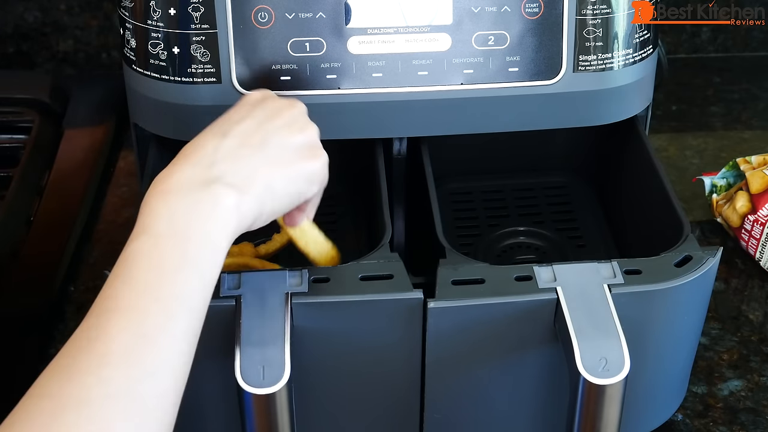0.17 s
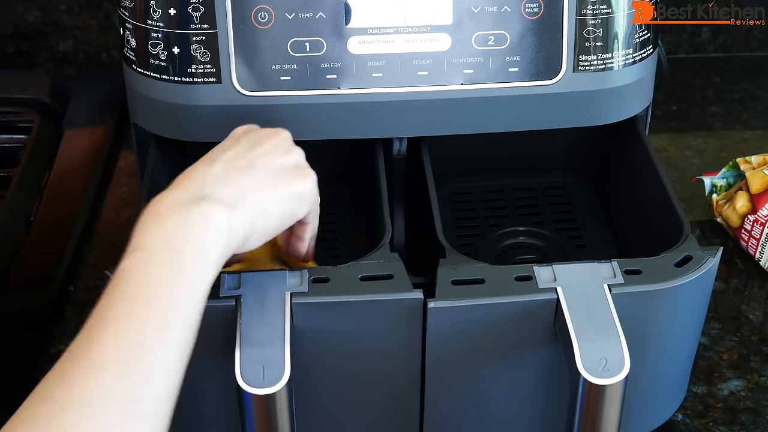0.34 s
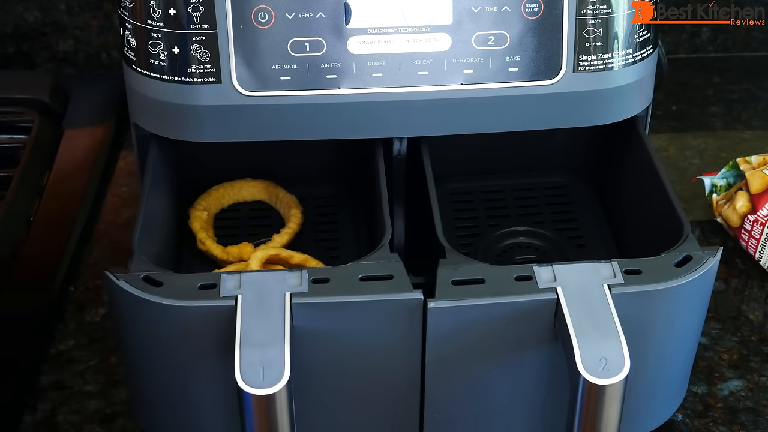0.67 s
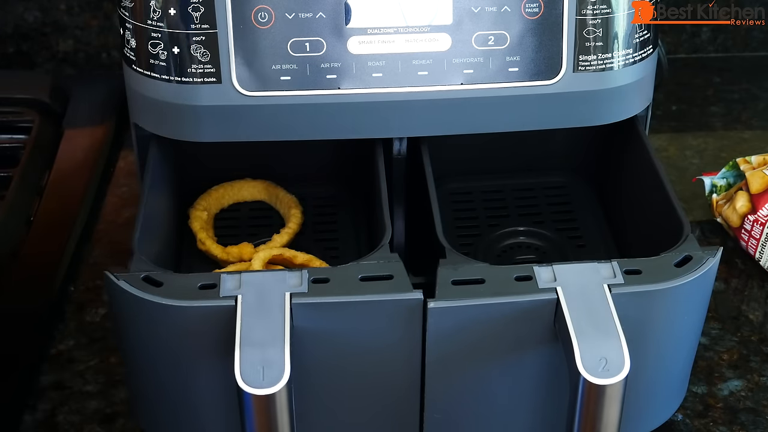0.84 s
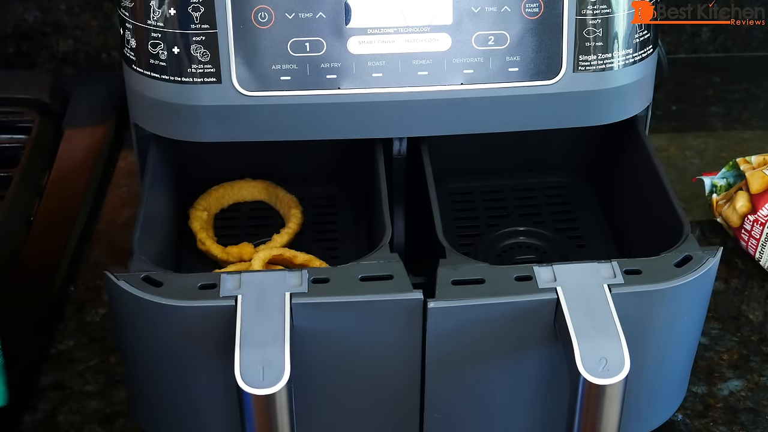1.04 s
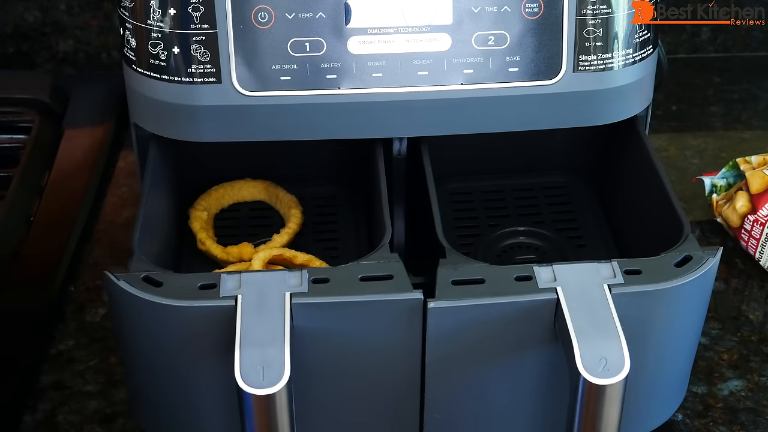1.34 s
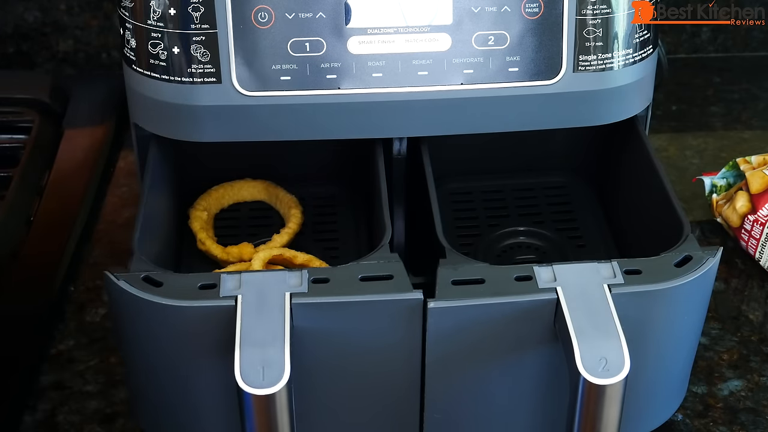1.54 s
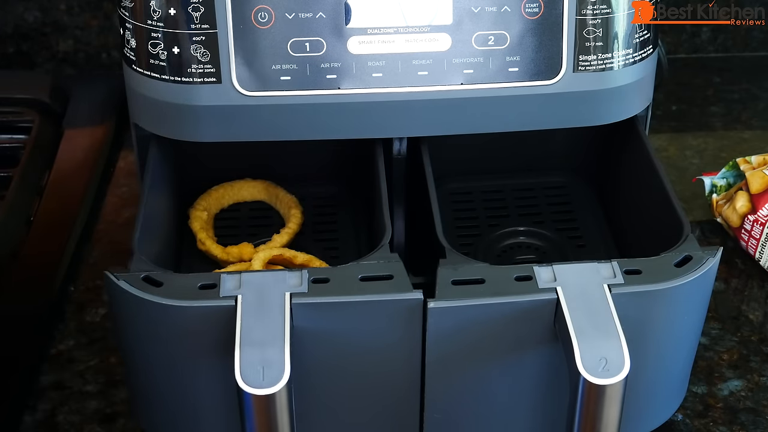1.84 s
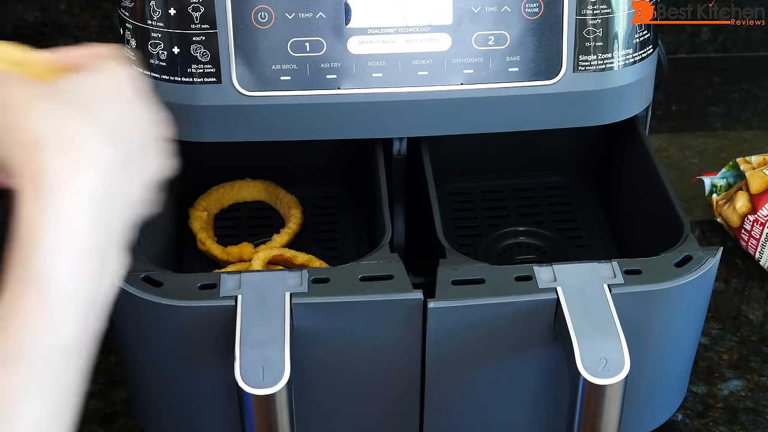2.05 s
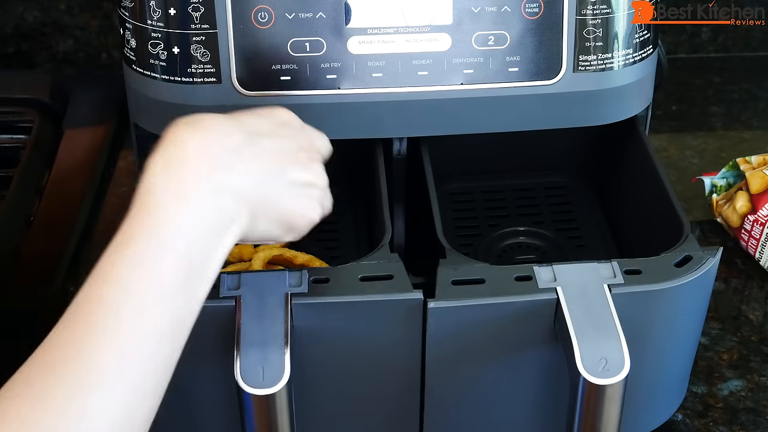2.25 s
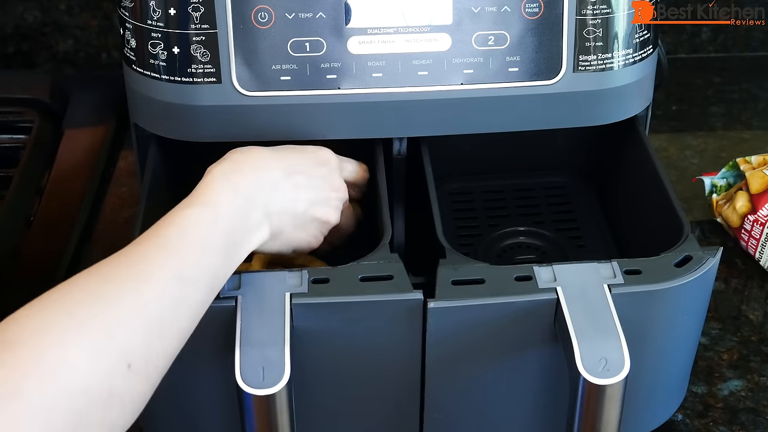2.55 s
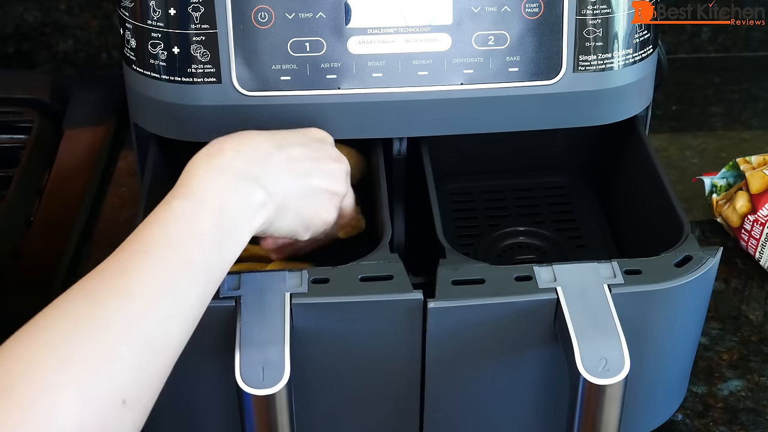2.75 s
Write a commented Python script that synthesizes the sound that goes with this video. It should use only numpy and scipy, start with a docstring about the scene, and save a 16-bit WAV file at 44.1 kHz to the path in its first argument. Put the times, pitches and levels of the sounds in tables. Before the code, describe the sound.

Crusty frozen rings land with light tings and low rattling thuds, then crisp plastic bag crinkling and snapping, a short near silence, and a louder hollow knock with scraping. Close miking, short kitchen reverberation, faint air.

```python
"""Onion rings laid in an air fryer basket

Frozen rings are laid by hand in a small kitchen. Breading scrapes as bursts of coloured clicks and pings.
After the hollow tail of an earlier basket knock, the crisper plate tings and rocks under landing rings.
These and the knocked basket wall are sums of decaying modes. A plastic bag crinkles in click bursts,
its larger folds snapping as short noise with a worktop echo. Shaped noise gives the faint air;
each source passes through a synthetic stereo room response."""
import sys
import numpy as np
from scipy import signal
from scipy.fft import rfft, irfft
from scipy.io import wavfile

SR = 44100
rng = np.random.default_rng(int(sys.argv[2]) if len(sys.argv) > 2 else 0)


def file_out(sig):
    """Save sig as 16-bit WAV at sys.argv[1]."""
    # one column per channel
    cols = np.atleast_2d(sig).T
    # limit, then scale
    lim = np.clip(cols, -1, 1)
    pcm = np.round(lim * 32767).astype(np.int16)
    wavfile.write(sys.argv[1], SR, pcm)


N = 127890  # length of the scene in samples

# Hard crumbs touching the basket: start_s, rise_s, hold_s, fade_t60_s, level_db,
# tilt_db_per_octave, resonance_hz, resonance_db
CRUMB_SCRAPES = [(0.0, .002, 0.008, 0.25, -36.5, 0.6, 5940, 2),
                 (.088, 0.0053, 0.035, 0.16, -53.5, 3.5, 5000, 0),
                 (.122, .012, 0.0033, 0.05, -40, 3.5, 3500, -6),
                 (.138, .007, 0.011, 0.13, -30, 1, 1400, 1.5),
                 (.234, 0.0016, 0.0088, 0.051, -32.5, 1.5, 1900, 15),
                 (.241, 0.0028, 0.0059, 0.16, -37, 7, 4120, 2),
                 (.293, 0.0094, 0.01, 0.19, -48, -1, 4870, 19),
                 (.354, .003, 0.017, 0.058, -43.5, 3, 7340, 4),
                 (.369, .002, 0.026, 0.03, -35.5, -0.4, 2130, 3),
                 (.392, .005, 0.012, 0.11, -38.5, 0, 7900, 4),
                 (.616, 0.0015, 0.011, 0.045, -48.5, 5, 7860, 3),
                 (.629, 0.0023, .008, 0.12, -34.5, -2, 3530, 9.5),
                 (.706, 0.0027, 0.0026, 0.15, -41, -4.5, 6850, 14.5),
                 (2.45, 0.018, .015, 0.089, -58.5, 1.5, 7000, 4.5),
                 (2.488, .016, 0.013, 0.12, -24, 0.56, 945, 5),
                 (2.54, 0.0038, 0.044, 0.21, -35, -2, 1110, -1.5),
                 (2.598, 0.0036, 0.0079, 0.057, -23, -2, 850, 5),
                 (2.612, 0.0016, 0.05, 0.36, -35.5, -4, 1670, 10),
                 (2.722, 0.0014, 0.0053, 0.17, -37, -2, 1550, 4),
                 (2.828, 0.0045, 0.005, 0.17, -67, 1.5, 6900, 4)]
# Rings landing on the plate; the first row is the hollow ringing tail of an earlier basket knock:
# start_s, ting_level_db, ting_centre_hz, thud_level_db, thud_centre_hz
TINGS_AND_THUDS = [(.003, -41, 2100, -27.5, 306), (.09, -59.5, 4500, -35.5, 293),
                   (.144, -44, 5400, -16.5, 303), (0.165, -34, 6900, -21.5, 453),
                   (.237, -41, 5300, -22, 630), (0.262, -38.5, 3480, -25, 380),
                   (.296, -39.5, 5110, -33.5, 600), (.369, -39.5, 2105, -26, 244),
                   (.388, -36.5, 3800, -22, 380), (.401, -38, 8150, -35.5, 613),
                   (0.629, -32, 2800, -23.5, 273)]
# Bending modes of the crisper plate: frequency_hz, relative_level_db, t60_s
PLATE_MODES = [(2110, -1, .1), (2225, -3, .12), (3367, -7, .17), (3430, -5, .16), (3779, -5, .12),
               (4357, -2, .14), (4497, -5, .18), (5262, -7, .14), (5372, -4, .14), (7068, -9, .12),
               (7190, -10, .12), (8250, -4, .17), (9100, -6, .13), (9911, -7, .12), (10640, -10, .13)]
# Modes of the plate rocking on its feet: frequency_hz, relative_level_db, t60_s
ROCKING_MODES = [(187.5, -12.5, .25), (242.7, -2.5, 0.33), (262, -5, 0.21), (293.8, -7, 0.35),
                 (324.6, 0, 0.25), (364.4, 2.5, 0.15), (400, -3, 0.29), (456, -7, 0.26), (517, -11, 0.35),
                 (654, -11, 0.16), (648.5, 5.5, 0.15), (699, -21.5, .1), (783, -27.5, .1)]
# Knocks on the basket wall: start_s, level_db, tilt_db_per_octave, centre_hz, emphasis_db
WALL_KNOCKS = [(.0, -35.5, 4, 1664, 7.5), (2.504, -33, 7.5, 990, 1), (2.539, -34, -27, 290, 16),
               (2.602, -16.5, -1.5, 413, 7.5), (2.636, -25.5, 0, 418, -2.5), (2.672, -24, 1, 427, 16),
               (2.729, -31, -8.5, 396, -3)]
# Modes of the basket: frequency_hz, relative_level_db, t60_s
BASKET_MODES = [(258, -17, .45), (322, -12, .45), (371.5, 0, .35), (412, -7, .22), (446, -5, .3),
                (476, -10, .3), (603, -19, .4), (725, -21, .38), (824, -14, .5), (910, -19, .4),
                (1037, -21, .4), (1165, -24, .33), (1270, -21, .42), (1520, -26, .33), (1916, -23, .34),
                (2140, -22, .33)]
# Handfuls of crinkling bag: start_s, rise_s, hold_s, fade_t60_s, level_db,
# tilt_db_per_octave, resonance_hz, resonance_db
BAG_CRUMPLES = [(.76, 0.019, 0.016, 0.28, -52, 2, 3830, -3), (.818, 0.015, 0.063, .1, -34, -1, 463, 2.5),
                (.869, 0.008, 0.034, 0.16, -29.5, -0.9, 1620, 5.5),
                (.952, 0.0045, 0.0066, 0.083, -26, -1.5, 6500, 8.5),
                (.99, 0.004, 0.11, 0.45, -37, -0.35, 820, 2.5),
                (1.077, 0.007, 0.0043, 0.05, -36, 4, 5500, 5),
                (1.107, 0.0076, 0.0063, 0.095, -26.5, 2.5, 3860, 0),
                (1.152, 0.0026, 0.0031, 0.11, -25.5, 2.5, 6000, 6),
                (1.185, 0.0061, 0.035, 0.25, -40.5, 1.5, 850, 12.5),
                (1.245, .004, 0.031, 0.21, -32.5, 0.8, 930, 8.5),
                (1.318, 0.0033, 0.024, 0.1, -39.5, -1, 1000, -3.5),
                (1.39, 0.0067, 0.044, 0.15, -54, -0.5, 4080, 2),
                (1.459, 0.0038, 0.021, 0.14, -42.5, -2, 1320, 13.5),
                (1.499, 0.008, 0.01, 0.2, -26.5, 0.5, 1633, 6.5),
                (1.581, 0.00053, 0.0077, 0.09, -28.5, 1, 2100, 10.5),
                (1.596, 0.002, 0.0099, 0.12, -32.5, 0, 5060, 9),
                (1.632, 0.003, 0.023, 0.18, -35.5, -1.5, 1580, 9.5),
                (1.679, 0.0052, 0.019, 0.2, -36, -1.3, 3400, 2.5),
                (1.7, .004, 0.005, 0.18, -32, 1.6, 478, 10.5),
                (1.73, 0.0095, 0.009, 0.11, -41.5, 1.5, 3430, -1),
                (1.778, 0.021, 0.015, 0.11, -38.5, 0.7, 6070, 1.5),
                (1.803, 0.0048, 0.0027, 0.045, -37, -1.5, 2710, 26),
                (2.265, 0.017, 0.033, .1, -71.5, 3.5, 4470, 3)]
# Folds of the bag snapping over: start_s, level_db, tilt_db_per_octave, resonance_hz, resonance_db
BAG_SNAPS = [(0.9472, -15, 0.3, 2000, 13), (1.1471, -14.5, 6.5, 5800, 0.5), (1.239, -16, 1.8, 3800, 4.5),
             (1.275, -24, -1, 900, 1), (1.512, -23, -1, 1500, 7), (1.5809, -23.5, -3.5, 3000, 23.5),
             (1.649, -34, -11, 1100, 23)]
# Spectral shape of crumb contacts: frequency_hz, relative_level_db
CRUMB_SPECTRUM = [(40, -64), (110, -23.5), (200, 8.5), (330, 14.5), (600, 11.5), (1100, 2), (2100, -0.5),
                  (3000, -2.5), (4400, -2), (7000, -7.5), (10000, -9.5), (15000, -22.5)]
# Spectral shape of the bag film: frequency_hz, relative_level_db
BAG_SPECTRUM = [(40, -25), (100, -18), (180, 2.5), (600, 7), (1100, 1), (2200, -1), (3000, -1.5),
                (4000, -1.5), (7000, -5.5), (10000, -11), (12500, -18.5), (15000, -29)]
# Spectral shape of the room air: frequency_hz, relative_level_db
AIR_SPECTRUM = [(25, -2), (90, -21), (190, -9.5), (270, 6.5), (420, -3), (700, -10), (2000, -17.5),
                (6000, -22.5), (10500, -26.5), (15000, -42)]
# Reverberation of the kitchen: frequency_hz, t60_s
ROOM_DECAY = [(150, 1.66), (400, .5), (1000, 0.5363), (3000, 0.39), (7000, 0.29), (14000, 0.51)]
# Echo that differs between the ears: frequency_hz, side_gain_db (each source adds its own offset)
STEREO_WIDTH = [(60, -1), (150, -11), (350, -10), (700, -6), (1500, -5), (3000, -8), (5000, -10),
                (9000, -5), (14000, 1)]

SIZE = 32768  # samples in one burst, blow or room response
T = np.arange(SIZE) / SR
FOCUS_OCTAVES = 0.52  # standard deviation of a contact's resonance


def amp(db):
    """Decibel law: a level in dB becomes an amplitude ratio."""
    return 10 ** (np.asarray(db) / 20)


def add(track, start_s, sound):
    """Superposition: a sound is summed into a track from its start time."""
    i = max(int(start_s * SR), 0)
    track[i:i + len(sound)] += sound[:N - i]


def along(points, hz):
    """Logarithmic frequency scale: values are interpolated between (Hz, value) points."""
    point_hz, values = np.array(points).T
    return np.interp(np.log(hz + 1), np.log(point_hz), values)


def fade(t, t60_s):
    """Exponential decay: amplitude falls by 60 dB in one t60."""
    return np.exp(-np.log(1000) * np.maximum(t, 0) / t60_s)


def contact_tone(hz, tilt_db, centre_hz, bump_db):
    """Contact filtering: a spectral tilt and a broad resonance, in dB, about one centre."""
    octaves = np.log2(np.maximum(hz, 200) / centre_hz)
    return tilt_db * octaves + bump_db * np.exp(-(octaves / FOCUS_OCTAVES) ** 2 / 2)


def colour(x, spectrum, tone=(0, 1, 0)):
    """Minimum-phase filtering: a causal response of unit mean power follows spectrum and tone."""
    n = len(x)
    hz = np.fft.rfftfreq(n, 1 / SR)
    gain = amp(along(spectrum, hz) + contact_tone(hz, *tone))
    unit_gain = gain / np.sqrt(np.mean(gain ** 2))
    # folding the cepstrum onto positive time makes the response causal
    cepstrum = irfft(np.log(unit_gain), n)
    cepstrum[1:n // 2] *= 2
    cepstrum[n // 2 + 1:] = 0
    return irfft(rfft(x) * np.exp(rfft(cepstrum)), n)


def pops(count=26):
    """Impulse excitation of resonators: scattered pings of single flakes and creases."""
    t60_s, strikes_per_s = 0.018, 35  # strikes at each pitch
    out = np.zeros(SIZE)
    # one random pitch in each equal logarithmic step from 700 to 12600 Hz
    steps = (np.arange(count) + rng.random(count)) / count
    for hz in 700 * 18 ** steps:
        radius = fade(1 / SR, t60_s)
        angle = 2 * np.pi * hz / SR
        # this weight offsets the logarithmic spacing, giving about equal power per Hz
        strikes = np.sqrt(hz) * (rng.random(SIZE) < strikes_per_s / SR)
        poles = [1, -2 * radius * np.cos(angle), radius ** 2]
        out += signal.lfilter([np.sin(angle)], poles, strikes)
    return out / out.std()


def crackle(bursts, spectrum, clicks_per_s, spread_db):
    """Crackling noise: random impulses of uneven size, with pings, rise, hold and fade."""
    ping_share = 0.46  # amplitude share; clicks supply the remaining power
    out = np.zeros(N)
    for start_s, rise_s, hold_s, t60_s, level_db, *tone in bursts:
        sign = rng.choice([-1, 1], SIZE)
        struck = rng.random(SIZE) < clicks_per_s / SR
        click_size = amp(spread_db * np.minimum(rng.exponential(size=SIZE), 4))
        clicks = sign * struck * click_size
        grains = np.sqrt(1 - ping_share ** 2) * clicks / clicks.std() + ping_share * pops()
        envelope = np.minimum(T / rise_s, 1) ** 2 * fade(T - rise_s - hold_s, t60_s)
        add(out, start_s, amp(level_db) * colour(grains * envelope, spectrum, tone))
    return out


def ring(modes, level_db, tone, rise_s):
    """Modal superposition: decaying sines start together, a tone weighting each mode."""
    hz, mode_db, t60_s = np.array(modes).T[:, :, None]
    gain = amp(mode_db + contact_tone(hz, *tone))
    swing = np.sin(2 * np.pi * (hz * T + rng.random(hz.shape)))
    attack = np.sin(np.pi / 2 * np.minimum(T / rise_s, 1)) ** 2
    modal_sum = np.sum(gain * swing * fade(T, t60_s), 0)
    return amp(level_db) * attack * modal_sum / np.sqrt(np.sum(gain ** 2) / 2)


def kitchen(x, early_db, late_db, side_db):
    """Room response: direct sound, quick nearby reflections and a frequency-dependent tail."""
    hz = np.fft.rfftfreq(SIZE, 1 / SR)
    centres_hz, t60s = np.array(ROOM_DECAY).T
    noise = rfft(rng.standard_normal((2, SIZE)))
    late = np.zeros((2, SIZE))
    # overlapping bands, each with its own decay
    for band, t60_s in zip(np.eye(len(centres_hz)), t60s):
        band_gain = along(np.c_[centres_hz, band], hz)
        late += irfft(noise * band_gain) * fade(T, t60_s)
    late *= np.minimum(T / 0.0049, 1)
    early = rng.standard_normal((2, SIZE)) * fade(T, 0.057) * np.minimum(T / 0.00067, 1)
    # echo levels are relative to the direct sound
    early *= amp(early_db) / np.linalg.norm(early[0])
    late *= amp(late_db) / np.linalg.norm(late[0])
    mid, side = early + late
    mid[0] += 1  # direct sound
    side = irfft(rfft(side) * amp(along(STEREO_WIDTH, hz) + side_db))
    response = np.array([mid + side, mid - side]) / np.linalg.norm(mid)
    return signal.fftconvolve(x[None], response, axes=1)[:, :N]


def hush():
    """Stationary noise: spectrally shaped randomness forms the faint steady air of the room."""
    air = amp(-67) * colour(rng.standard_normal(N), AIR_SPECTRUM)
    return kitchen(air, early_db=-10, late_db=-3.5, side_db=12.5)


def bag():
    """Buckling film: creases crackle; larger folds snap and reflect off the worktop."""
    snap_t60_s, echo_delay_s, echo_db = 0.0079, 0.0049, 2.5  # echo relative to the snap
    out = crackle(BAG_CRUMPLES, BAG_SPECTRUM, clicks_per_s=2600, spread_db=2)
    for start_s, level_db, *tone in BAG_SNAPS:
        burst = rng.standard_normal(SIZE) * fade(T, snap_t60_s)
        snap = amp(level_db) * colour(burst, BAG_SPECTRUM, tone)
        add(out, start_s, snap)
        add(out, start_s + echo_delay_s, amp(echo_db) * snap)
    return kitchen(out, early_db=-6.5, late_db=-11, side_db=3.5)


def basket():
    """Modal vibration of a shell: the knocked wall rings and flexes under the hardest knock."""
    flex_start_s, flex_hz, flex_length_s, flex_db = 2.6005, 416, 0.0143, -3.5
    out = np.zeros(N)
    for start_s, level_db, *tone in WALL_KNOCKS:
        add(out, start_s, ring(BASKET_MODES, level_db, tone, rise_s=0.0046))
    # the flex lasts a few cycles
    swell = np.sin(np.pi * np.minimum(T / flex_length_s, 1)) ** 2
    flex = amp(flex_db) * swell * np.sin(2 * np.pi * flex_hz * T)
    add(out, flex_start_s, flex)
    return kitchen(out, early_db=-17.5, late_db=-14.5, side_db=3)


def plate():
    """Modal vibration of a plate: landings ting and thud; its modes also voice the opening knock's tail."""
    ting_rise_s, thud_rise_s, thud_lag_s = 0.00067, 0.0086, 0.005
    ting_focus_db, thud_focus_db = 17.5, 5  # emphasis near each row's centre
    out = np.zeros(N)
    for start_s, ting_db, ting_hz, thud_db, thud_hz in TINGS_AND_THUDS:
        ting = ring(PLATE_MODES, ting_db, (0, ting_hz, ting_focus_db), ting_rise_s)
        thud = ring(ROCKING_MODES, thud_db, (0, thud_hz, thud_focus_db), thud_rise_s)
        add(out, start_s, ting)
        add(out, start_s + thud_lag_s, thud)
    return kitchen(out, early_db=-11.5, late_db=-14, side_db=2.5)


def crumbs():
    """Rough contact: frozen breading scrapes and ticks as many tiny impacts on the basket."""
    scrapes = crackle(CRUMB_SCRAPES, CRUMB_SPECTRUM, clicks_per_s=4600, spread_db=2.5)
    return kitchen(scrapes, early_db=-8, late_db=-9.5, side_db=2.5)


def scene():
    """Linear superposition: all the sources heard in the kitchen are summed."""
    return hush() + bag() + basket() + plate() + crumbs()


def record(dry):
    """Band limiting: the microphone thins the deep bass and the recorder cuts the top."""
    bass_cut = signal.butter(2, 69, "high", fs=SR, output="sos")  # corner in Hz
    top_cut = signal.ellip(8, 0.2, 80, 15200, fs=SR, output="sos")  # ripple dB, rejection dB, edge Hz
    thinned = signal.sosfilt(bass_cut, dry)
    return signal.sosfilt(top_cut, thinned)


dry = scene()
out = record(dry)
file_out(out)
```